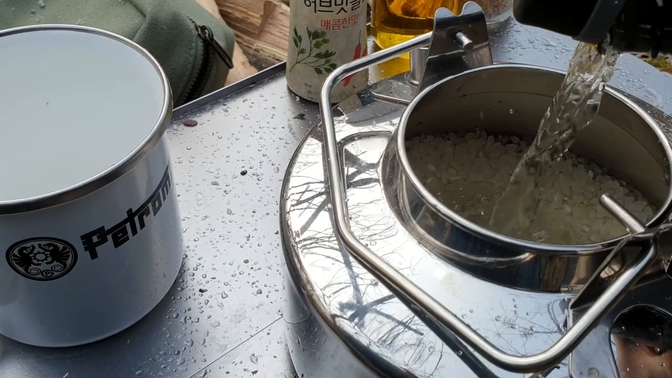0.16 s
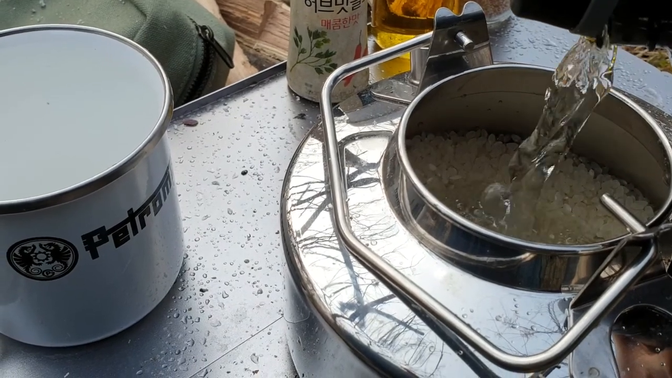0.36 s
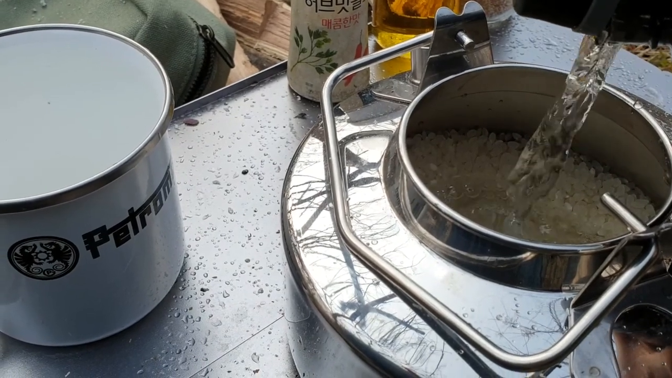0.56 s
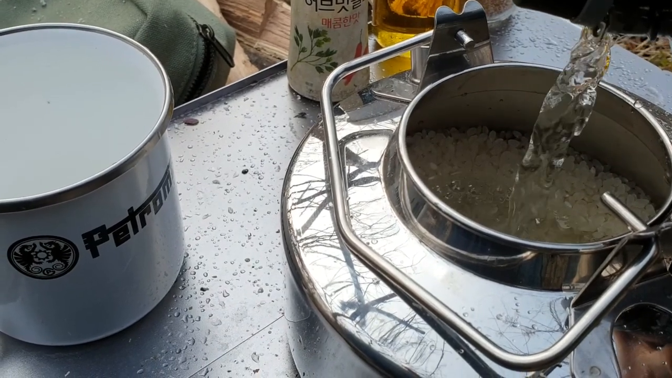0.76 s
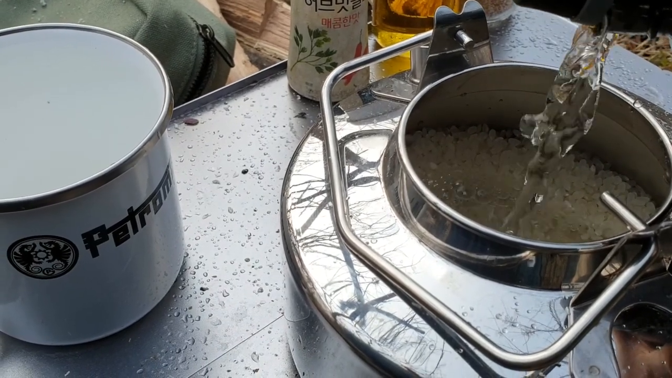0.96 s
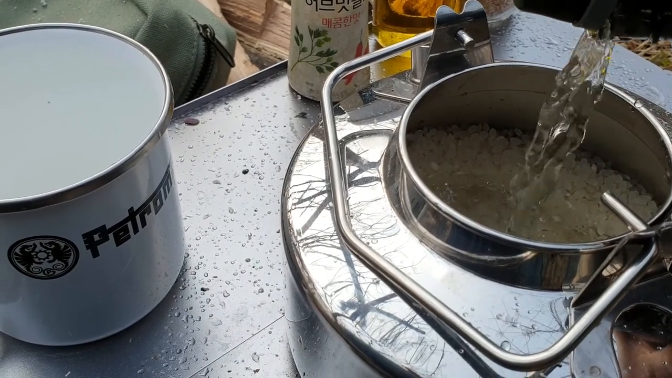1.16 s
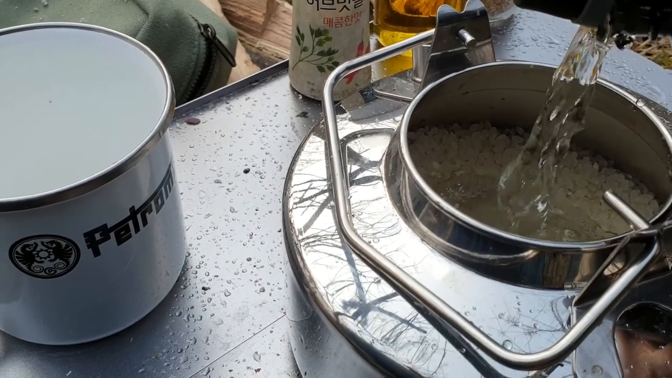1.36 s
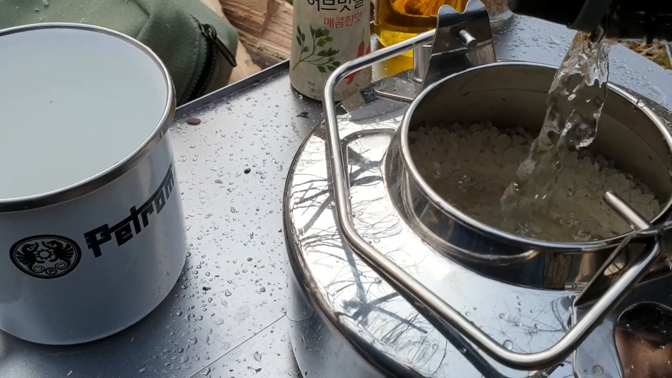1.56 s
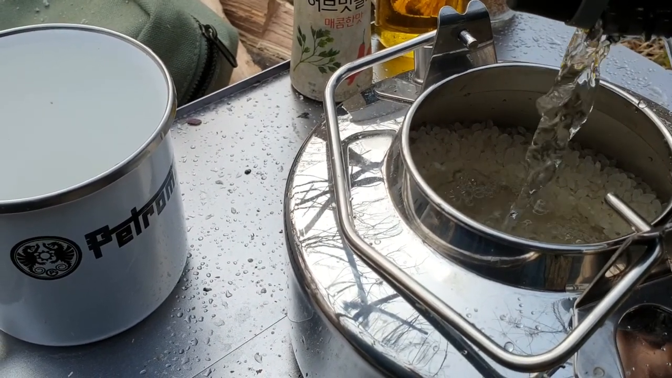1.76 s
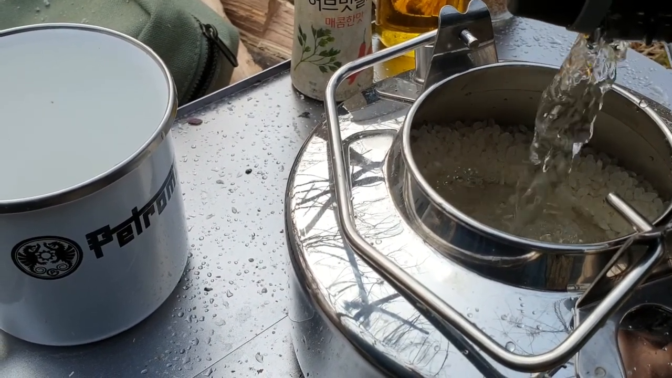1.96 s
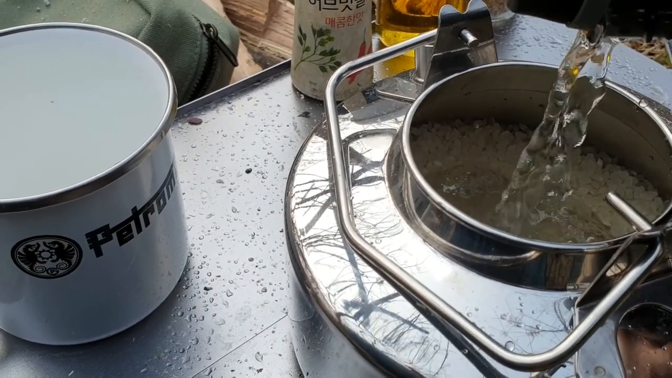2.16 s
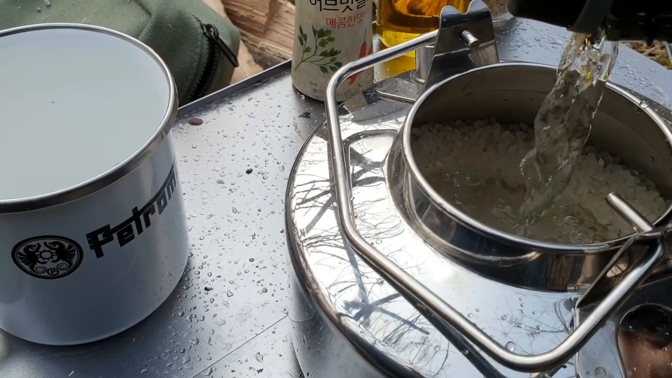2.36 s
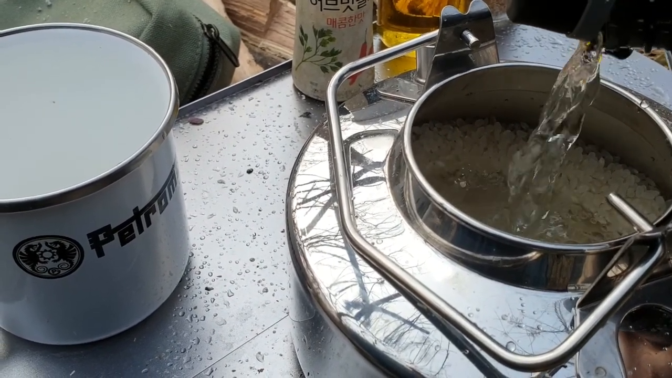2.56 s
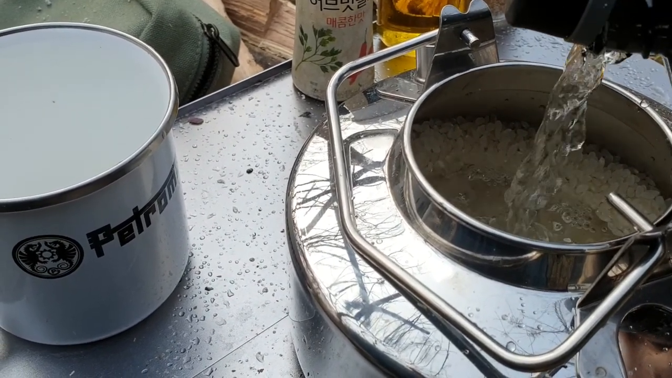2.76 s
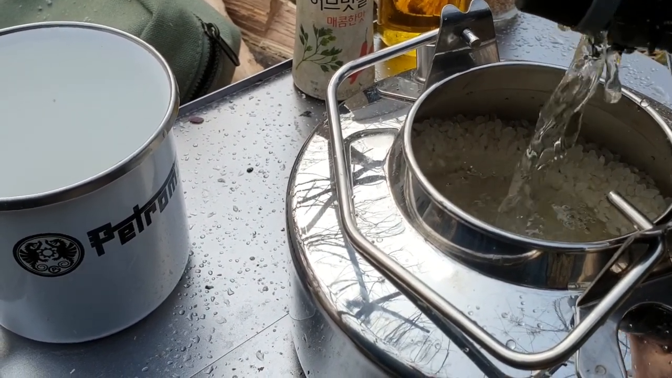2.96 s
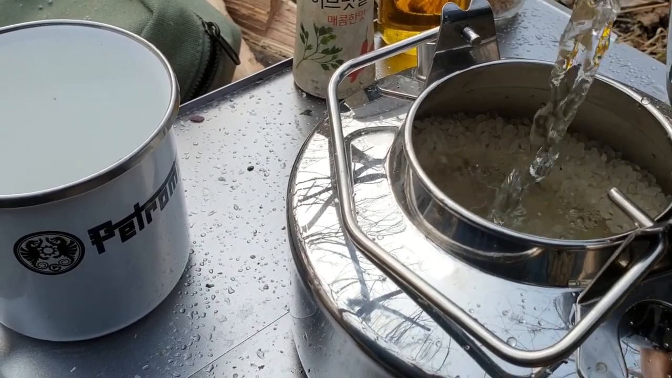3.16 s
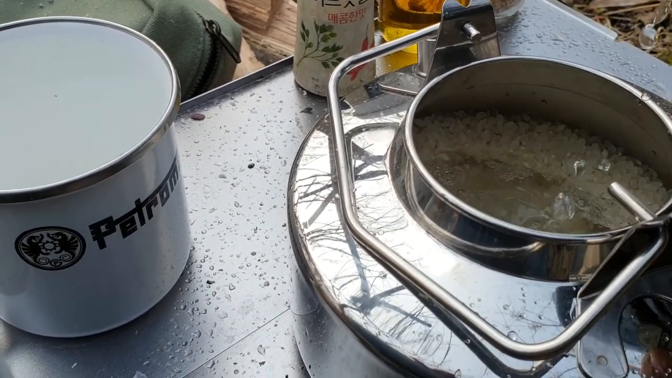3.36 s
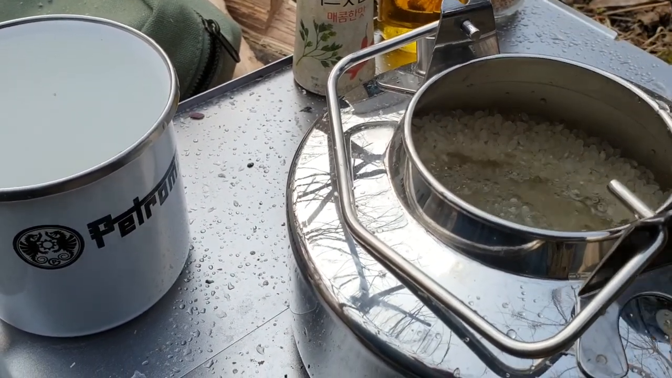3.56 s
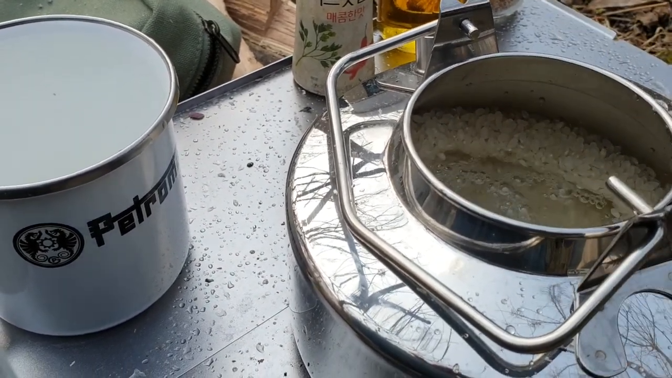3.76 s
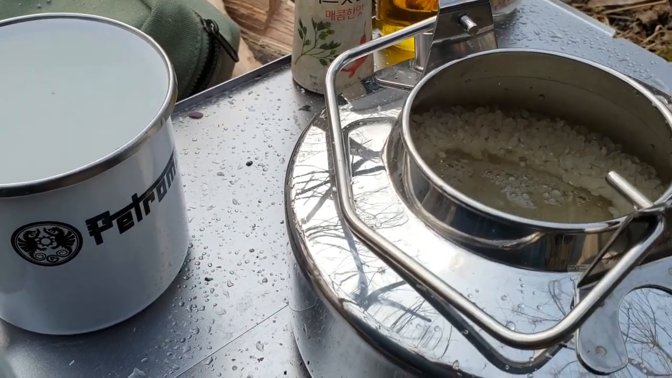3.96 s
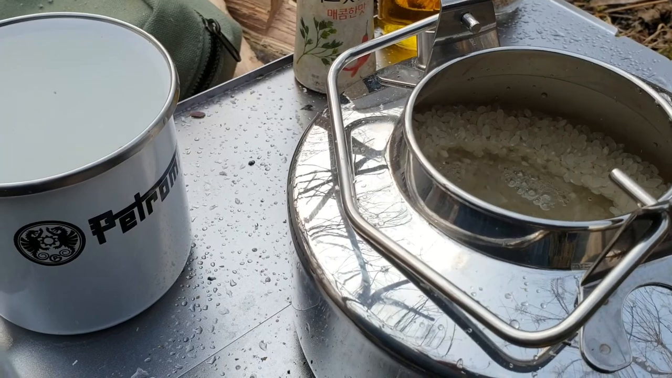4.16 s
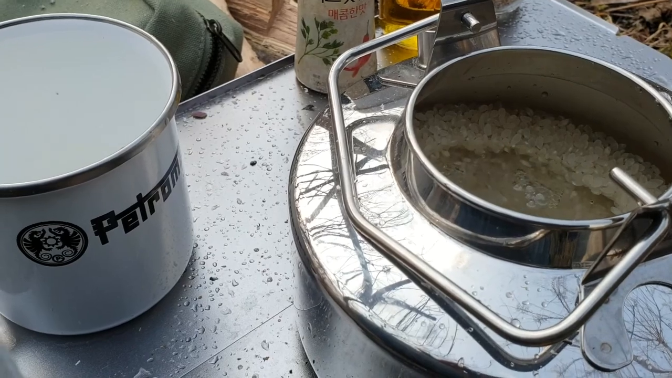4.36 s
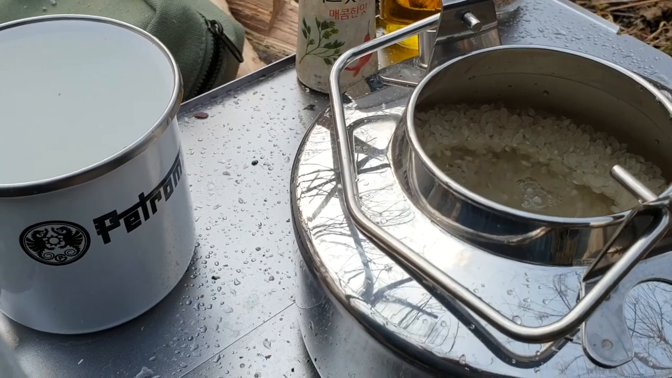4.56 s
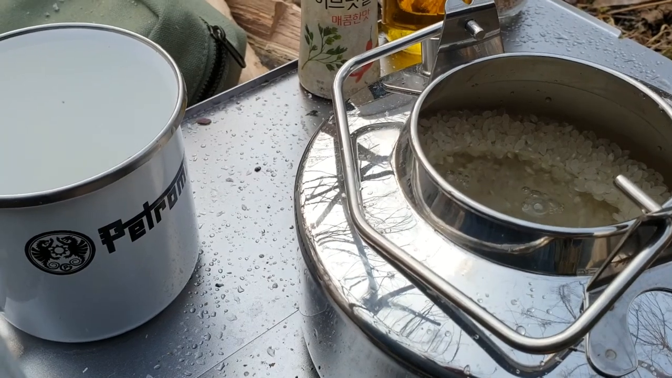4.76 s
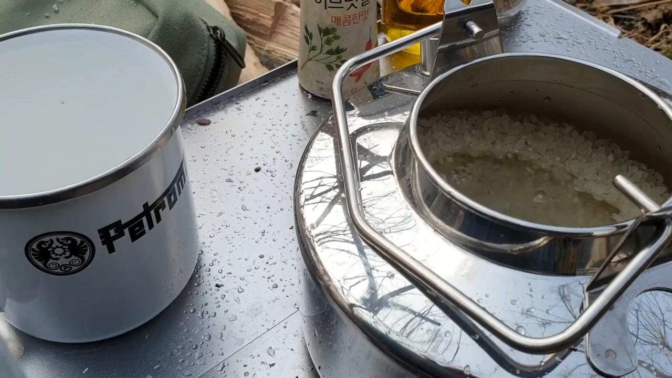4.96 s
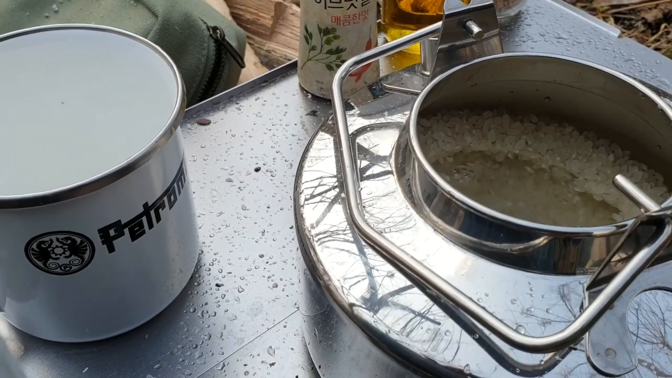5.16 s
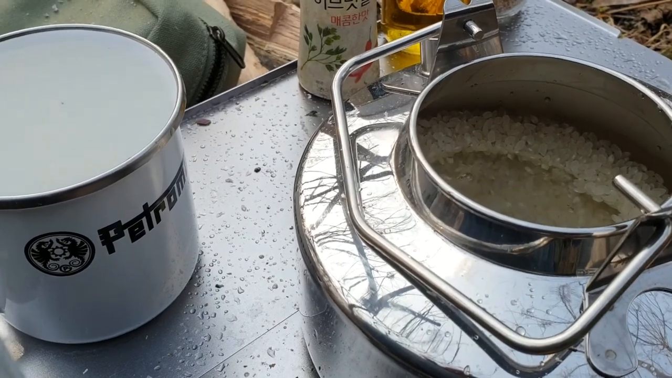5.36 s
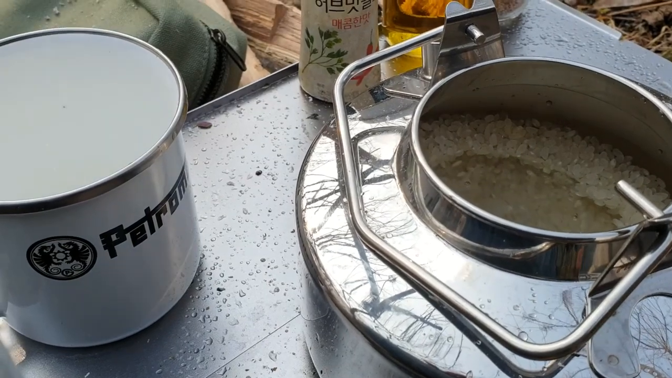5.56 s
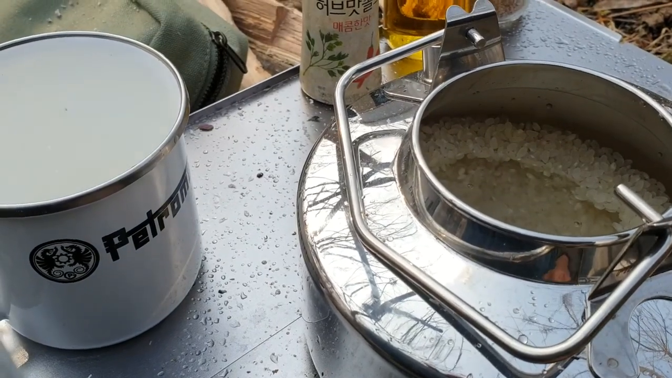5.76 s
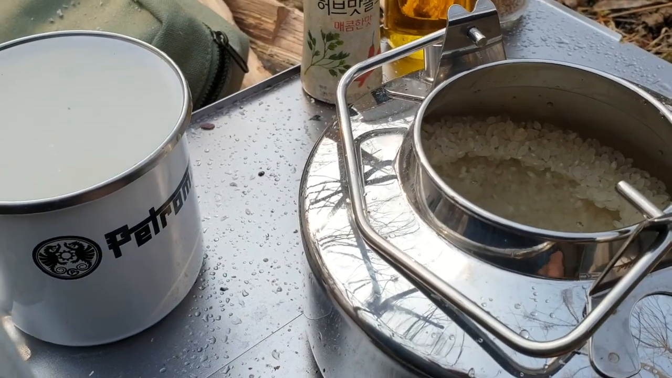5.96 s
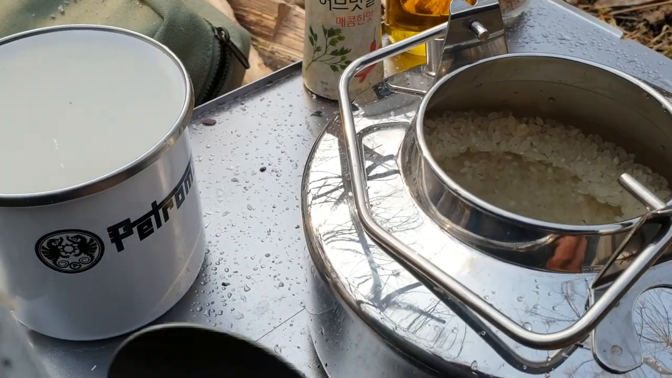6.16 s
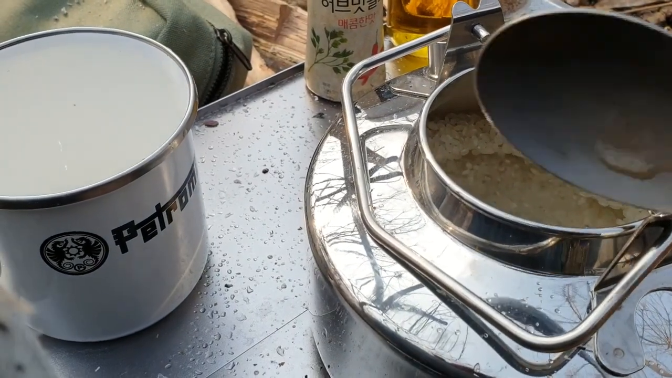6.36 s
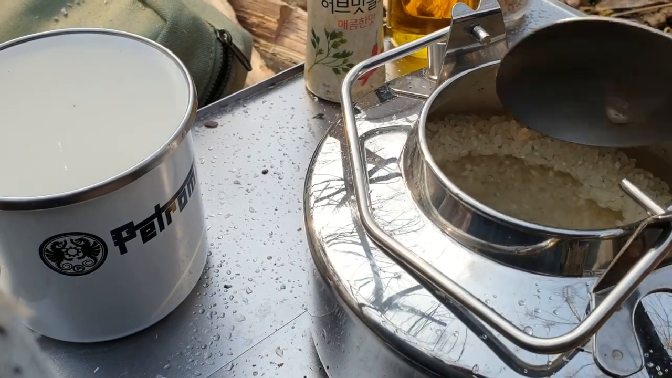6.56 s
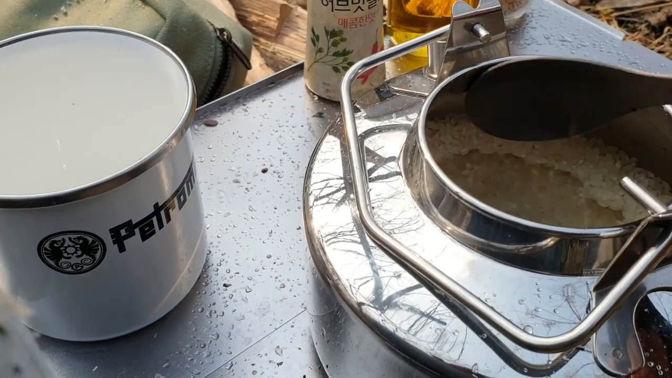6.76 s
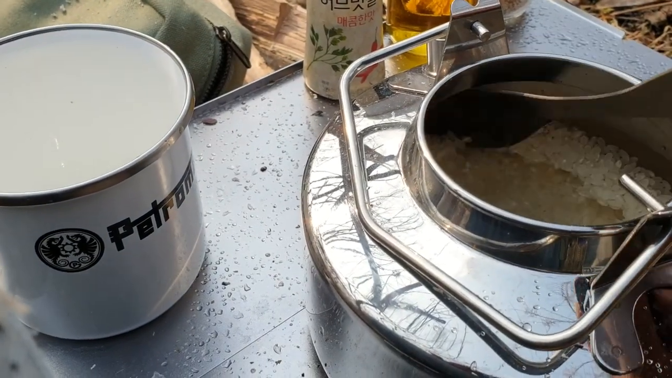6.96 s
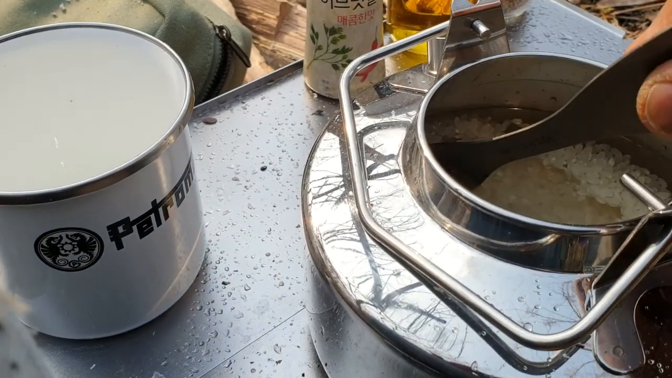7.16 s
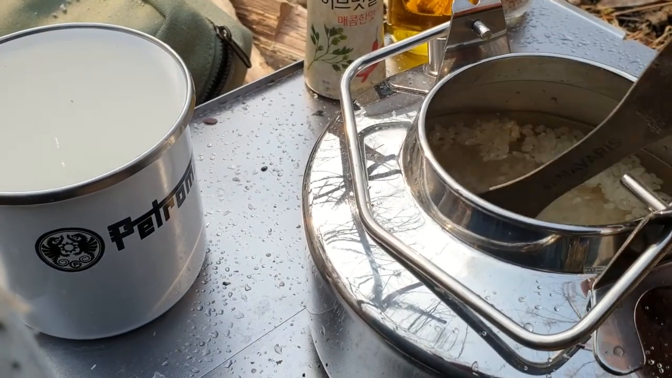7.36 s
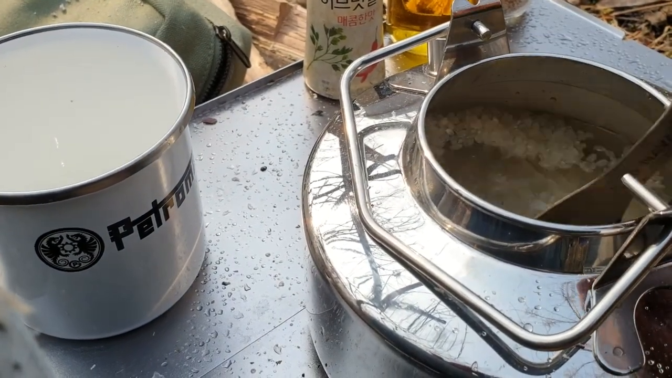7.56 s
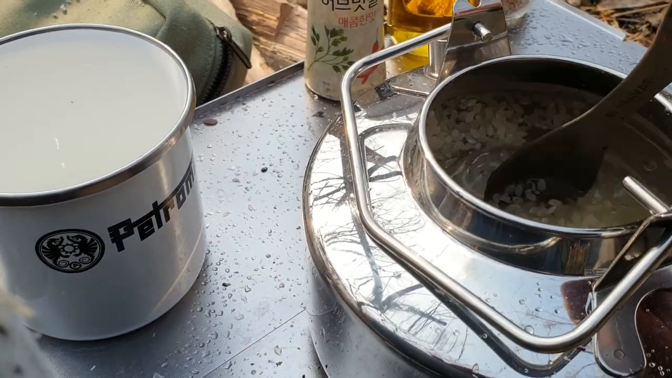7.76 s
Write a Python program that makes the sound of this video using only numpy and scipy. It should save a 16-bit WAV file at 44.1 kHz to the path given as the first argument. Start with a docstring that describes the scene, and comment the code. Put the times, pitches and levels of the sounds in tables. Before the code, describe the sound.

Irregular glugging water slaps and bubbles inside a small metal pot for over three seconds, rising in pitch towards the end. Then only a few drips, fading foam, a cloth brush to the right and one very faint far bird note over low outdoor rumble. A spoon raps hard on the camp table, strikes the steel pot with two short clinks, and pushes crunchily through soaked rice. Everything is near and dry, with short metallic reflections.

```python
"""A lumpy stream of water falls on rice in a small steel pot, close to the microphone, outdoors: falling lumps trap
pockets of air that plop in the pot's hollow, small bubbles ring as damped sines and spray crackles as noise.
The stream stops, drops tick and a sleeve rustles as shaped noise. A spoon knocks on the camp table as it is
picked up and clinks twice on the pot, ringing their modes, then is pushed through the wet rice as gritty grains.
A far bird, a sine, calls once; a distant low rumble and a faint hiss of noise lie under it all."""
import sys
import numpy as np
from scipy import signal
from scipy.fft import rfft, irfft, next_fast_len
from scipy.io import wavfile

SR = 44100
rng = np.random.default_rng(int(sys.argv[2]) if len(sys.argv) > 2 else 0)


def store_wav(level_fs):
    """Save 16-bit WAV to argv[1]."""
    pcm = np.round(np.clip(np.atleast_2d(level_fs), -1, 1) * 32767)
    wavfile.write(sys.argv[1], SR, pcm.T.astype(np.int16))


N = 344421

# Levels in the tables and settings are relative: each source has its own gains and filters on top.

# The distant rumble's spectrum. Each row: frequency in Hz, level per Hz in dB.
RUMBLE_SPECTRUM = [(20, -37.5), (40, -13), (65, 2), (91, -6.5), (120, -4), (208, -11.5), (318, -22.5),
                   (520, -29), (1010, -24.5), (1400, -30), (2000, -47.5), (3250, -62.5), (5500, -96)]
# How alike left and right microphone hear the noise. Each row: frequency in Hz, likeness from -1 to 1.
LIKENESS = [(50, 0.97), (700, 0.29), (1200, -0.56), (2500, 0.096), (5000, 0.28), (16000, -0.19)]
# One faint, far bird note. The row: start in seconds, length in seconds, pitch in Hz, level in dB.
BIRD = (5.095, .11, 1010, -59)
# Brushes of the sleeve. Each row: peak time in seconds, level in dB, seconds to swell or fade by 20 dB.
BRUSHES = [(4.07, -42.5, 0.04), (4.47, -55.5, 0.13), (4.6, -58.5, .1), (5.56, -71, 0.1), (6.08, -67.5, .2),
           (6.37, -68.5, 0.13), (6.49, -70.5, 0.5)]
# The cloth's spectrum. Each row: frequency in Hz, level per Hz in dB.
CLOTH_SPECTRUM = [(600, -28.5), (1200, -5.5), (1900, -13.5), (2400, -11.5), (3200, -12.5), (6300, -2.5),
                  (11700, -2), (14300, -5), (16000, -7)]
# A light touch on the table, then the spoon's knocks. Each row: start in seconds, rattle level in dB,
# t60 of the rattle in seconds, ring level in dB, brightness in Hz.
KNOCKS = [(4.592, -54, 0.21, -56, 4000), (5.944, -46, 0.15, -41, 1790), (5.957, -44.5, 0.29, -36.5, 1800),
          (5.9918, -20, 0.12, -30.5, 6000), (6.0038, -15.5, 0.028, -24, 4000),
          (6.020, -36, 0.091, -28, 3000)]
# Modes of the table top. Each row: frequency in Hz, level in dB, t60 in seconds.
TABLE_MODES = [(161, -17, .1), (254, -24, 0.072), (347.4, -10, 0.16), (404.4, -1.5, 0.082),
               (922, -10.5, 0.082), (1008, -6, 0.072), (1194, -8.5, 0.11), (1380, -5.5, 0.12),
               (1469, -12, 0.23), (1680, -7, 0.1), (2270, -21, 0.21), (2755, -11, 0.13), (3435, -13, 0.084),
               (4689, -8, 0.091)]
# The rattle's spectrum. Each row: frequency in Hz, level per Hz in dB.
RATTLE_SPECTRUM = [(50, -35), (120, -18), (260, -4.5), (400, 11), (750, -4), (1100, 10), (2000, -2),
                   (2900, -3.5), (6000, -1.5), (11000, -4.5), (15500, -11)]
# The spoon strikes the pot's wall, then jolts against its floor. Each row: start in seconds, clash level in dB,
# t60 of the clash in seconds, ring level in dB, brightness in Hz.
CLINKS = [(6.7446, -15.5, 0.028, -23, 15000), (6.7463, -12, 0.031, -22, 10000),
          (6.8208, -35, 0.091, -48, 7000), (6.8297, -14.5, 0.04, -22, 6960),
          (7.1658, -36, 0.026, -33, 1500), (7.263, -55, .03, -39, 1500), (7.296, -42, 0.024, -31, 1500)]
# Modes of the pot. Each row: frequency in Hz, level in dB, t60 in seconds.
POT_MODES = [(487, -24, 0.086), (697, -11, 0.14), (760, -28, .07), (1460, -22, .6), (1484, -10.5, 0.14),
             (2660, -10.5, 0.076), (2990, -4, 0.063), (3500, -17.5, .05), (4135, -3.5, 0.073),
             (4430, -14.5, 0.06), (5070, -1.5, 0.06), (6100, -1, .055), (6940, -0.5, .06), (7250, -4, .045),
             (8000, -1.5, 0.057), (9000, -5, 0.045), (10300, -4, 0.043), (11800, -2.5, 0.047),
             (14100, -12.5, .04)]
# The clash's spectrum. Each row: frequency in Hz, level per Hz in dB.
CLASH_SPECTRUM = [(300, -36.5), (550, 0.5), (1000, -7), (2100, -10), (3000, -8), (5000, -2.5), (7500, -2),
                  (10000, -6.5), (13000, -7), (15500, -14)]
# The spoon dips into the rice, then ploughs through it: one curve a stroke.
# Each row: time in seconds, push against the pot in dB, crunch in dB.
STROKES = [
    [(6.875, -47.5, -49), (6.945, -45, -35), (6.969, -45, -38.5), (6.987, -54, -57), (7.023, -66, -49),
     (7.077, -49, -57), (7.109, -61, -62), (7.157, -60, -66), (7.164, -45, -51)],
    [(7.165, -42, -45), (7.181, -41, -51), (7.229, -47, -47.5), (7.321, -33.5, -37.5),
     (7.457, -35.5, -43.5), (7.555, -45, -45.5), (7.597, -40, -42.5), (7.635, -58.5, -67.5),
     (7.8, -77, -69.5)],
]
# Resonances of the pot under the spoon. Each row: frequency in Hz, width in Hz, level in dB.
STIR_BODY = [(463, 20, -2), (545, 58, -1.5), (590, 23, -1.5), (657, 31, -0.5), (743, 48, -6),
             (950, 320, -15), (1420, 25, -11), (1523, 86, -11), (1740, 44, -10.5), (2240, 95, -18),
             (2810, 210, -16)]
# The crunch's spectrum. Each row: frequency in Hz, level per Hz in dB.
CRUNCH_SPECTRUM = [(350, 18), (600, -1), (1400, -6), (2000, -4), (3000, -1), (4500, -2), (6500, -3.5),
                   (8500, -8.5), (11000, -6.5), (13000, -11), (15500, -14.5)]
# Last drops after the stream ends. Each row: start in seconds, level in dB.
DRIPS = [(3.478, -39), (3.6193, -47.5), (3.8187, -51), (4.2348, -48), (4.7126, -48.5), (4.739, -50),
         (4.873, -55), (5.003, -56), (5.639, -47.5), (5.715, -47)]
# The spray's spectrum. Each row: frequency in Hz, level per Hz in dB.
SPRAY_SPECTRUM = [(900, -14), (1400, 0.5), (2000, -10.5), (3000, -3), (4600, -2), (6200, 0), (8000, -1),
                  (10200, 2), (12800, -2.5), (15500, 0)]
# The loudest bubbles that pinch off. Each row: start in seconds, level in dB, pitch in Hz.
BUBBLES = [(0.1276, -26.5, 3040), (0.315, -26, 4720), (0.5034, -28, 3110), (0.5616, -24, 3690),
           (0.6221, -21.5, 3030), (0.7337, -28, 2940), (0.8323, -24, 2840), (0.9084, -29, 4000),
           (1.9835, -27.5, 2920), (2.0901, -27.5, 3040), (2.2318, -26.5, 4220), (2.4538, -25, 3100),
           (2.6739, -21.5, 4430), (2.834, -20, 3010), (2.916, -30, 2300), (2.9961, -21.5, 2980),
           (3.1117, -24.5, 3740), (3.3048, -20.5, 3390), (3.306, -21.5, 4650), (3.3545, -25.5, 2900),
           (3.3908, -29, 3110)]
# Bands in which the pot rings along with the bubbles. Each row: frequency in Hz, width in Hz, level in dB.
BUBBLE_RING = [(2810, 300, -4), (3100, 290, -0.5), (3680, 320, -8.5), (4610, 460, -3.5)]
# The flow of the stream. Each row: time in seconds, churning in dB, bubbling in dB, spray in dB.
POUR = [(0.0, -45, -50.5, -51.5), (0.78, -48.5, -48, -51), (0.9, -46, -50, -51), (1.4, -49.5, -54, -52.5),
        (1.92, -47, -49.5, -51), (3.25, -50.5, -48, -52.5), (3.43, -59.5, -65.5, -65), (3.6, -68, -79, -75)]
# The biggest lumps of water slap the surface, then trap a pocket of air.
# Each row: slap time in seconds, slap level in dB, plop level in dB, pocket size (1 fits the pot's hollow).
LUMPS = [(0.0, -39, -28.5, 0.99), (0.126, -29, -25.5, 0.99), (0.189, -40, -23, 1), (0.2685, -28, -42, 1.05),
         (0.335, -34, -26, 1.01), (0.392, -39, -27.5, 0.96), (0.473, -29.5, -24.5, 1.02),
         (0.503, -29, -27, 0.54), (0.52, -34, -24, 1), (0.622, -27.5, -24.5, 0.97), (0.674, -27, -31, 0.97),
         (0.7265, -24, -24.5, 0.98), (0.767, -16, -30, 0.98), (0.812, -30, -30, 1.02), (0.928, -27, -31, 1),
         (0.974, -32, -30.5, 0.98), (0.992, -38, -24.5, 0.65), (1.3114, -22, -41, 1),
         (1.339, -27.5, -26.5, 0.65), (1.492, -31, -26.5, 0.89), (1.8, -26.5, -28.5, 1.03),
         (1.872, -22.5, -28.5, 1), (1.912, -24, -38, 1.05), (2.09, -23, -21, 1.04), (2.186, -21, -25, .9),
         (2.307, -27, -27.5, .7), (2.389, -31, -22, 1.05), (2.468, -19.5, -32, 0.94),
         (2.507, -32, -24.5, .9), (2.542, -35, -27, 1.11), (2.584, -24.5, -36, 0.92),
         (2.625, -34, -28, 1.1), (2.6735, -27.5, -41, 0.94), (2.77, -30, -24, 1.01),
         (2.832, -26, -31, 1.03), (2.995, -23.5, -30, 1.01), (3.075, -32, -32.5, 0.98),
         (3.149, -31, -26, 0.91), (3.277, -26, -29, .9), (3.302, -21.5, -28, 0.88), (3.352, -27, -35, 1.03),
         (3.389, -27, -38.5, 1)]
# The air in the pot and its floor. Each row: frequency in Hz, width in Hz, level in dB.
HOLLOW = [(277, 20.4, -5.5), (532.3, 52, 0), (630, 61, -5.5), (839, 50, -6), (1230, 170, -18),
          (1458, 26, -10)]

CUTOFF_HZ = 16000
RUMBLE_DB, RUMBLE_EASES_S, RUMBLE_EASE_DB_PER_S = -48, 6.35, 2.5  # the rumble holds, then recedes
STREAM_END_S, POUR_END_S = 3.4, 3.6  # the churned water settles a moment after the stream ends
FOAM_DB, FOAM_FADE_DB_PER_S = -67.5, 9  # the foam left behind crackles away
LESSER_BUBBLES_PER_S, LESSER_BUBBLE_DB = 5, -33
LESSER_BUBBLE_HZ = (2905, 4200)  # most lie near the low end
# Lesser lumps fall at random between the big ones; the spread also serves the lesser bubbles.
SMALL_LUMPS_PER_S, SMALL_SLAP_DB, SMALL_PLOP_DB, SMALL_SPREAD_DB = 6, -33, -36.5, 4
PLOP_DELAY_S = .001  # from the slap to the closing of the pocket
# The plops climb, ever faster as the water rises over the rice.
EMPTY_PLOP_HZ, FULL_PLOP_HZ, FILL_POWER = 523.2, 760, 3.5
PLOP_SCATTER = .015  # share of the pitch


def from_db(db):
    """Decibels to gain."""
    return 10 ** (np.asarray(db) / 20)


def rms_one(x):
    """Scale to rms 1."""
    return x / np.sqrt(np.mean(x ** 2) + 1e-20)


def gains(rows):
    """Each dB column of a curve as a gain per sample, practically silent outside its span."""
    times, *columns = np.transpose(rows)
    t = np.arange(N) / SR
    return [from_db(np.interp(t, times, column, left=-150, right=-150)) for column in columns]


def pan(right_db):
    """Gains of the two channels, right_db apart."""
    return from_db(np.array([[-.5], [.5]]) * right_db)


def at_hz(points, size):
    """A spectrum read on the grid of an FFT, along log frequency."""
    hz, value = np.transpose(points)
    grid_hz = np.arange(size // 2 + 1) * SR / size
    return np.interp(np.log(grid_hz + 1), np.log(hz), value)


def convolve(x, response):
    """Pass one or two channels through an impulse response."""
    return signal.fftconvolve(np.atleast_2d(x), np.atleast_2d(response), axes=1)[:, :N]


def colour(x, spectrum, size=8192):
    """Causal (minimum-phase) filter of unit power with the given spectrum."""
    cepstrum = irfft(np.log(from_db(at_hz(spectrum, size))))
    # fold the cepstrum onto positive time
    cepstrum[1:size // 2] *= 2
    cepstrum[size // 2 + 1:] = 0
    response = irfft(np.exp(rfft(cepstrum)))
    return convolve(x, response / np.linalg.norm(response))


def air_noise():
    """White stereo noise whose left and right are as alike as LIKENESS says at each frequency."""
    size = 2 * next_fast_len(N // 2 + 1)
    alike = np.clip(at_hz(LIKENESS, size), -1, 1)
    shares = np.sqrt([(1 + alike) / 2, (1 - alike) / 2])
    mid, side = rfft(rng.standard_normal((2, size))) * shares
    return irfft([mid + side, mid - side])[:, :N]


def flutter(per_s, depth_db):
    """A gain that wanders at random."""
    knots = from_db(depth_db * rng.standard_normal(int(N / SR * per_s) + 2))
    return np.interp(np.arange(N) * (per_s / SR), np.arange(len(knots)), knots)


def grains(per_s, spread_db):
    """Random clicks of uneven size and either sign; rms 1."""
    out = np.zeros(N)
    count = int(per_s * N / SR) + 1
    where, size, sign = np.random.default_rng(rng.integers(2 ** 31)).random((count, 3)).T
    click_db = spread_db * np.minimum(-np.log(1 - size), 3)
    out[(where * N).astype(int)] = from_db(click_db) * np.sign(sign - .5)
    return rms_one(out)


def add(track, s, sound):
    """Lay a sound into a track at a time."""
    start = int(np.clip(s * SR, 0, N - 1))
    track[start:start + len(sound)] += sound[:N - start]


def dying(t60):
    """An exponential decay, half a second long."""
    return from_db(-60 * np.arange(SR // 2) / SR / t60)


def bursts(rows, attack_s=0.0001):
    """Noise that swells at each (s, dB, t60) and dies away; overlapping bursts add in power."""
    power = np.zeros(N)
    swell = 1 - np.exp(-(np.arange(SR // 2) / SR / attack_s) ** 2)
    for s, db, t60 in rows:
        add(power, s, (from_db(db) * swell * dying(t60)) ** 2)
    return np.sqrt(power) * air_noise()


def resonate(x, resonances):
    """Parallel resonances (Hz, width, dB) of alternating sign."""
    out = 0
    for k, (hz, width, db) in enumerate(resonances):
        b, a = signal.iirpeak(hz, hz / width, fs=SR)
        out = out + (-1) ** k * from_db(db) * signal.lfilter(b, a, x + 1e-18)
    return out


def struck(blows, modes, wide_hz=2000, uneven_db=5.0):
    """Blows (s, dB, brightness Hz) ring the modes; high modes reach the two ears in unrelated phase."""
    out, t = np.zeros((2, N)), np.arange(SR // 2) / SR
    for s, db, bright_hz in blows:
        for hz, mode_db, t60 in modes:
            apart = min(hz / wide_hz, 1) ** 2
            ring = from_db(db + mode_db) / np.hypot(1, hz / bright_hz) * dying(t60)
            for side in out:
                uneven = from_db(uneven_db * apart * rng.normal())
                phase = apart * rng.uniform(-np.pi, np.pi)
                add(side, s, ring * uneven * np.sin(2 * np.pi * hz * t + phase))
    return out


def pot_echoes(x, direct_db, t60=.028):
    """Sound bounces between the steel walls: a dense, short tail, different on each side."""
    tail = rng.standard_normal((2, SR // 2)) * dying(t60)
    tail /= np.linalg.norm(tail, axis=1, keepdims=True)
    tail[:, 0] += from_db(direct_db)
    return convolve(x, tail / np.linalg.norm(tail, axis=1, keepdims=True))


def crackle(per_s, spread_db, patchy_db, count=8):
    """Tiny impacts, each sounding in one band, in clumps that come and go band by band; rms 1."""
    out, edges = 0, np.geomspace(700, 17000, count + 1)
    white = rng.standard_normal((2, 2, N))  # neighbouring bands get unrelated noise
    decay = np.exp(-1 / (0.00051 * SR))
    for k, (low, high) in enumerate(zip(edges, edges[1:])):
        power = signal.lfilter([1], [1, -decay], grains(per_s, spread_db) ** 2 + 1e-12)
        ticks = rms_one(np.sqrt(power) * flutter(per_s=60, depth_db=patchy_db)) * white[k % 2]
        band = signal.butter(2, [low, high], "band", fs=SR, output="sos")
        out = out + signal.sosfilt(band, ticks)
    return rms_one(out)


def bubble_train(rows, cycles, rise, swell):
    """Each (s, dB, Hz) is a sine that swells, dies over some cycles and glides up as it nears the surface."""
    out = np.zeros(N)
    for s, db, hz in rows:
        turns = np.arange(int(cycles * SR / hz)) * hz / SR
        age = turns / cycles
        envelope = from_db(db - 60 * age) * (1 - np.exp(-turns / swell))
        add(out, s, envelope * np.sin(2 * np.pi * turns * (1 + rise * age / 2)))
    return out


def swarm(count, typical_hz, spread, lowest_hz, climb_per_s, spread_db=6):
    """Random bubbles (s, dB, Hz) while the water runs and settles, their pitch climbing with time."""
    s = rng.uniform(0, POUR_END_S, count)
    size, pitch = np.clip(rng.standard_normal((2, count)), -2.5, 2)
    hz = typical_hz * np.exp(spread * pitch + climb_per_s * s)
    return zip(s, spread_db * size, np.maximum(hz, lowest_hz))


def chances(per_s, count):
    """Random moments, one in each equal slot of the stream, each with some uniform draws of its own."""
    slots = int(per_s * STREAM_END_S)
    draws = np.random.default_rng(rng.integers(2 ** 31)).random((slots, count + 1))
    return [((k + s) / slots * STREAM_END_S, *rest) for k, (s, *rest) in enumerate(draws)]


def outdoors():
    """A distant rumble of coloured noise, one far bird note as a sine and a faint even hiss."""
    t = np.arange(N) / SR
    level = from_db(RUMBLE_DB - RUMBLE_EASE_DB_PER_S * np.maximum(t - RUMBLE_EASES_S, 0))
    wander = flutter(per_s=13, depth_db=1.17)
    rumble = level * colour(air_noise(), RUMBLE_SPECTRUM) * wander * pan(right_db=2.0)
    s, length, hz, db = BIRD
    swell = np.sin(np.pi * np.clip((t - s) / length, 0, 1))
    bird = from_db(db) * swell * np.sin(2 * np.pi * hz * t)
    return rumble + bird + from_db(-69.5) * air_noise()


def sleeve():
    """Cloth brushes on cloth, off to the right: fluttering noise that swells and fades."""
    t = np.arange(N) / SR
    level = sum(from_db(db - 20 * np.abs(t - s) / fade_s) for s, db, fade_s in BRUSHES)
    cloth = colour(air_noise() * flutter(per_s=280, depth_db=3), CLOTH_SPECTRUM)
    return from_db(3.5) * level * cloth * pan(right_db=3.5)


def table_knocks():
    """The spoon clatters on the thin table top: a noisy rattle over ringing modes."""
    noise = bursts([(s, db, t60) for s, db, t60, ring_db, hz in KNOCKS])
    rattle = colour(noise * flutter(per_s=1800, depth_db=3), RATTLE_SPECTRUM)
    ring = struck([(s, ring_db, hz) for s, db, t60, ring_db, hz in KNOCKS], TABLE_MODES)
    return (rattle + ring) * pan(right_db=-1.5)


def pot_clinks():
    """A brief clash of the spoon's edge, its echoes, and the ring of the water-damped steel."""
    clash = colour(bursts([(s, db, t60) for s, db, t60, ring_db, hz in CLINKS]), CLASH_SPECTRUM)
    echoes = from_db(-5.0) * pot_echoes(clash, direct_db=-18, t60=0.097)
    ring = struck([(s, ring_db, hz) for s, db, t60, ring_db, hz in CLINKS], POT_MODES)
    return clash + echoes + ring


def stirring():
    """Grains slip under the spoon, jolting the pot, and grind on each other in uneven clumps."""
    push, crunch = sum(np.array(gains(stroke)) for stroke in STROKES)
    slips = rms_one(resonate(grains(per_s=1200, spread_db=0.5), STIR_BODY))
    slips = signal.sosfilt(signal.butter(4, 410, "high", fs=SR, output="sos"), slips)
    grit = crackle(per_s=760, spread_db=3.5, patchy_db=1.5) * flutter(per_s=190, depth_db=1.5)
    grinding = colour(pot_echoes(grit, direct_db=-3.5, t60=0.053), CRUNCH_SPECTRUM)
    return from_db(1.5) * push * slips + from_db(7.8) * crunch * grinding * pan(right_db=-1.5)


def foam():
    """The level of the foam's crackle, fading once the stream has stopped."""
    age = np.arange(N) / SR - STREAM_END_S
    return (age > 0) * from_db(FOAM_DB - FOAM_FADE_DB_PER_S * age)


def spray(level, lumps):
    """Fine droplets crackle; lumps and last drops slap the surface as short bursts of noise."""
    droplets = level * crackle(per_s=600, spread_db=5.5, patchy_db=6)
    hits = [(s, db, .009) for s, db, *_ in lumps + list(DRIPS)]
    slaps = from_db(14.5) * bursts(hits, attack_s=0.0017)
    in_pot = pot_echoes(from_db(7.5) * droplets + slaps, direct_db=1.5, t60=0.024)
    return colour(in_pot, SPRAY_SPECTRUM) * pan(right_db=-0.5)


def lesser_bubbles():
    """Single bubbles (s, dB, Hz) at random between the loudest."""
    low, high = LESSER_BUBBLE_HZ
    return [(s, LESSER_BUBBLE_DB + SMALL_SPREAD_DB * (2 * size - 1), low + (high - low) * pitch ** 3)
            for s, size, pitch in chances(LESSER_BUBBLES_PER_S, count=2)]


def bubbling(level):
    """A swarm of small, quickly damped bubbles under the few loud ones, and the pot ringing along."""
    bubbles = swarm(count=1700, typical_hz=3490, spread=0.25, lowest_hz=2530, climb_per_s=0.022, spread_db=7.5)
    small = bubble_train(bubbles, cycles=35, rise=0.011, swell=0.24)
    ringing = resonate(grains(per_s=600, spread_db=14.5), BUBBLE_RING)
    loud = bubble_train(list(BUBBLES) + lesser_bubbles(), cycles=45.7, rise=0.018, swell=2.3)
    fizz = level * (from_db(-3) * rms_one(small) + from_db(-1.1) * rms_one(ringing))
    return pot_echoes(fizz + from_db(8) * loud, direct_db=2, t60=0.086) * pan(right_db=-1.5)


def falling_lumps():
    """The big lumps and the lesser ones between them: (s, slap dB, plop dB, pocket size)."""
    lesser = []
    for s, slap, plop in chances(SMALL_LUMPS_PER_S, count=2):
        slap_db = SMALL_SLAP_DB + SMALL_SPREAD_DB * (2 * slap - 1)
        plop_db = SMALL_PLOP_DB + SMALL_SPREAD_DB * (2 * plop - 1)
        lesser.append((s, slap_db, plop_db, 1))
    return list(LUMPS) + lesser


def plop_hz(s):
    """The pitch of an air pocket follows the filling of the pot, with some scatter."""
    filled = np.clip(s / STREAM_END_S, 0, 1) ** FILL_POWER
    hz = EMPTY_PLOP_HZ + (FULL_PLOP_HZ - EMPTY_PLOP_HZ) * filled
    return hz * np.exp(PLOP_SCATTER * rng.normal())


def plunge(churn, lumps):
    """Air pockets and the churning between them sound the hollow of the pot; the gurgle climbs as it fills."""
    plops = [(s + PLOP_DELAY_S, db, plop_hz(s) / size) for s, slap_db, db, size in lumps]
    pockets = bubble_train(plops, cycles=32.3, rise=0.0304, swell=0.49)
    impacts = np.zeros(N)
    for s, db, hz in plops:
        add(impacts, s, from_db([db]))
    knocked = resonate(impacts, HOLLOW)
    bubbles = swarm(count=200, typical_hz=608, spread=0.269, lowest_hz=480, climb_per_s=0.072, spread_db=3.0)
    gurgle = rms_one(bubble_train(bubbles, cycles=23, rise=0.065, swell=.5))
    churning = rms_one(resonate(grains(per_s=320, spread_db=3.0), HOLLOW))
    between = churn * (from_db(-0.5) * churning + from_db(-4.5) * gurgle)
    hollow = from_db(0.5) * pockets + from_db(38.0) * knocked + between
    ears = np.array([hollow, np.pad(hollow, (3, 0))[:N]])  # the left side hears it 3 samples sooner
    return ears + from_db(-11) * pot_echoes(hollow, direct_db=-20, t60=.035)


def scene():
    """Pot, table and sleeve by the microphone, with the distant open air behind."""
    churn, bubbles, droplets = gains(POUR)
    lumps = falling_lumps()
    background = outdoors() + sleeve()
    spoon = table_knocks() + pot_clinks() + stirring()
    water = spray(droplets + foam(), lumps) + bubbling(bubbles) + plunge(churn, lumps)
    return background + spoon + water


def record(dry):
    """The top is cut steeply by a low-pass."""
    return signal.sosfilt(signal.ellip(10, .2, 80, CUTOFF_HZ, fs=SR, output="sos"), dry)


dry = scene()
out = record(dry)
store_wav(out)
```